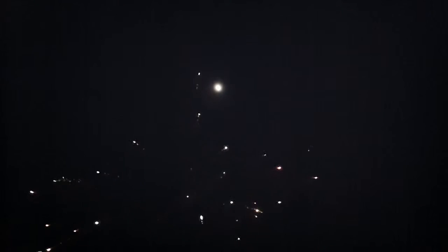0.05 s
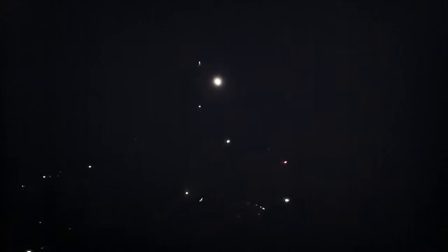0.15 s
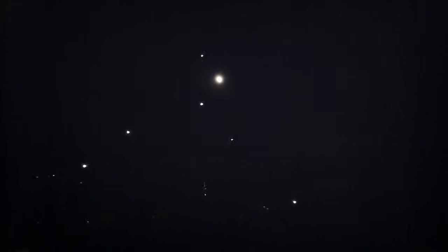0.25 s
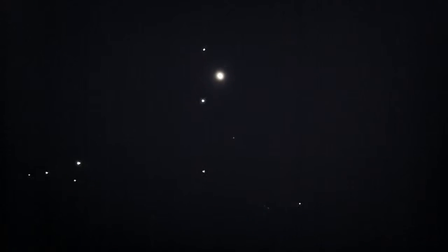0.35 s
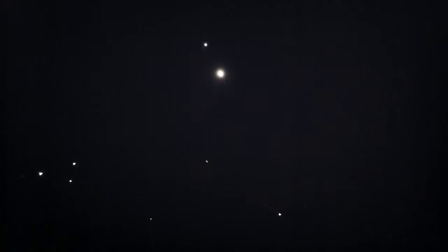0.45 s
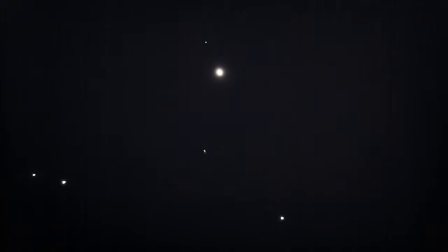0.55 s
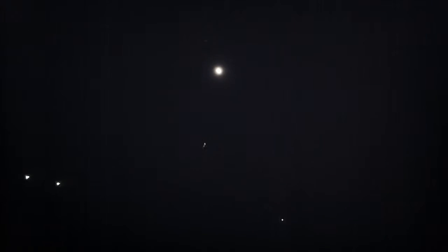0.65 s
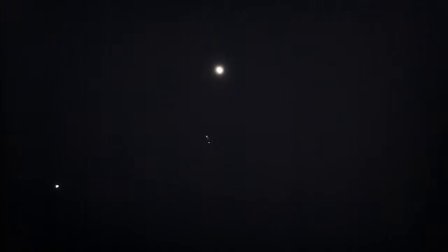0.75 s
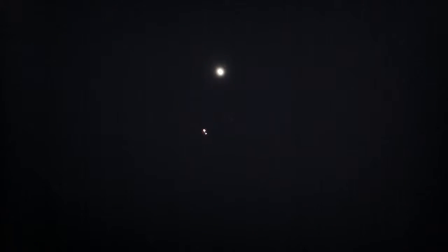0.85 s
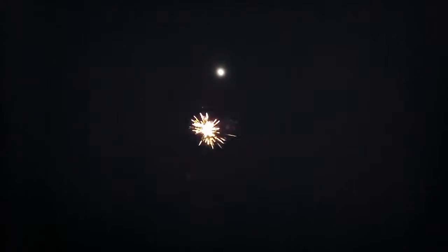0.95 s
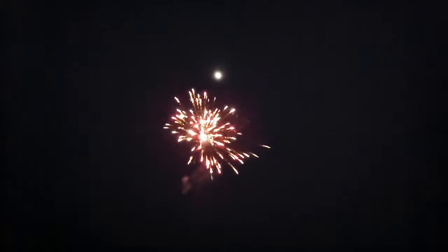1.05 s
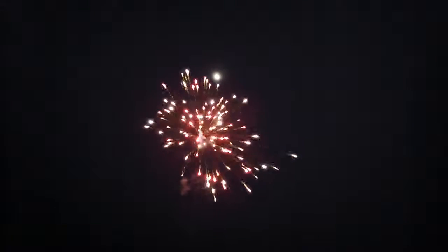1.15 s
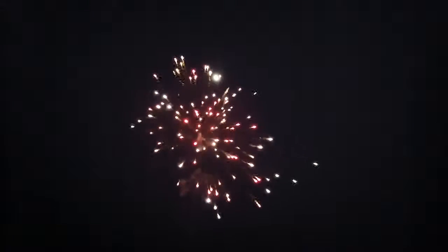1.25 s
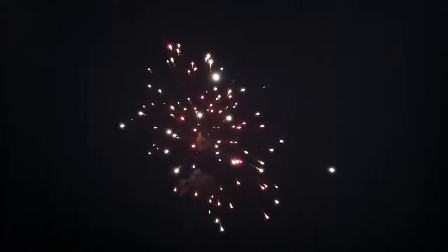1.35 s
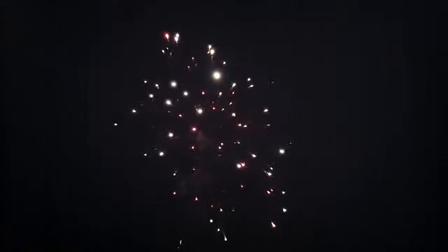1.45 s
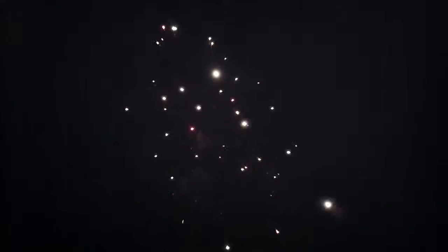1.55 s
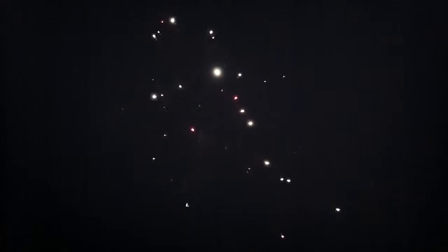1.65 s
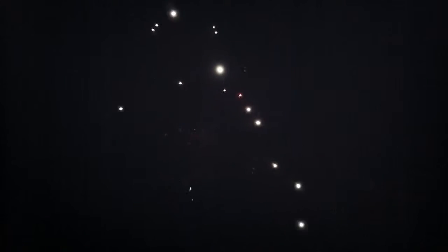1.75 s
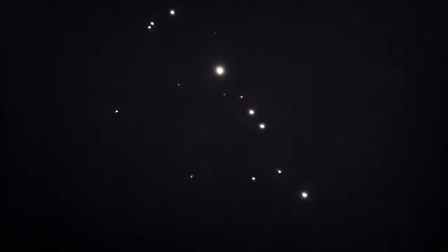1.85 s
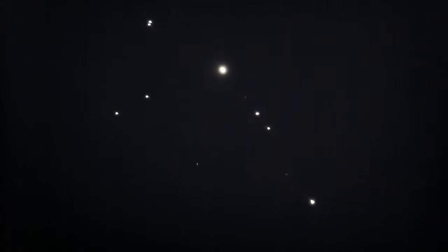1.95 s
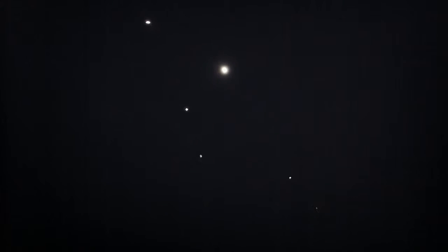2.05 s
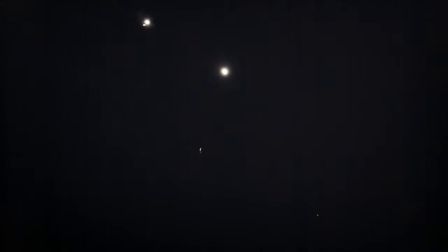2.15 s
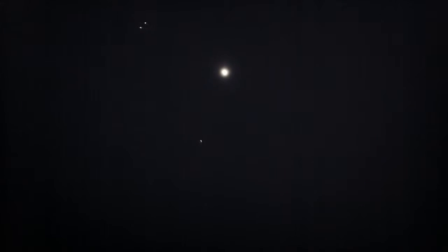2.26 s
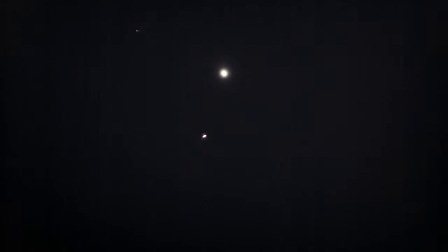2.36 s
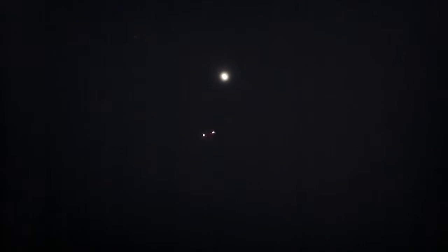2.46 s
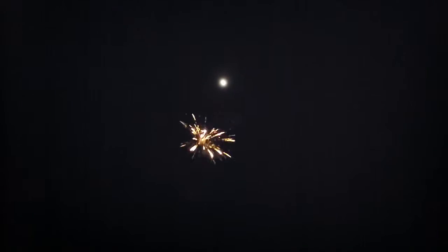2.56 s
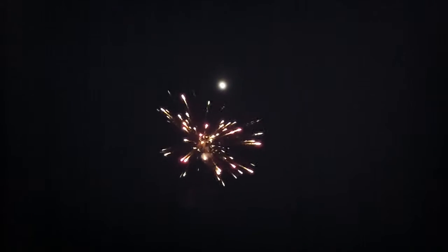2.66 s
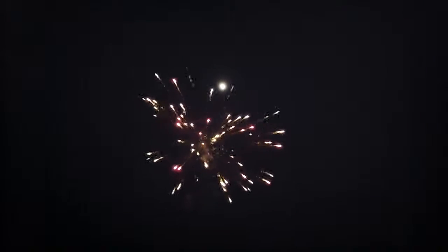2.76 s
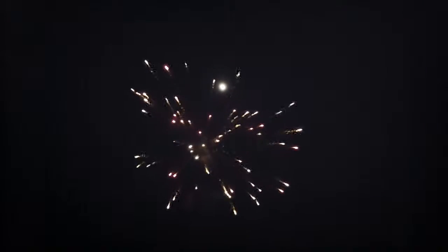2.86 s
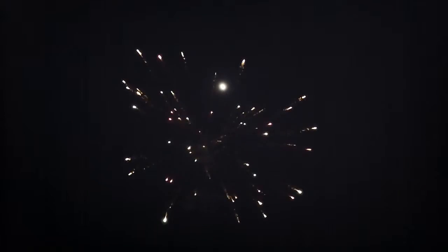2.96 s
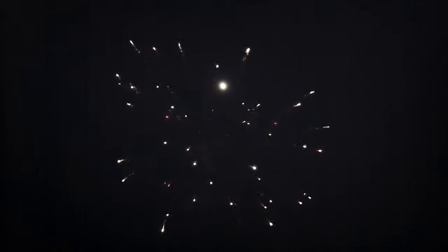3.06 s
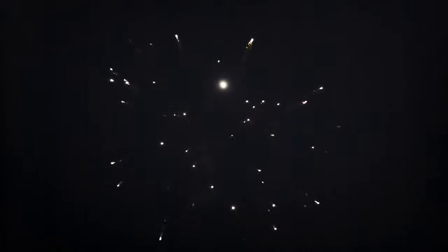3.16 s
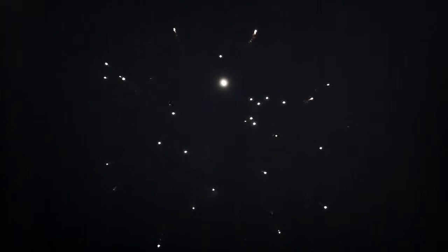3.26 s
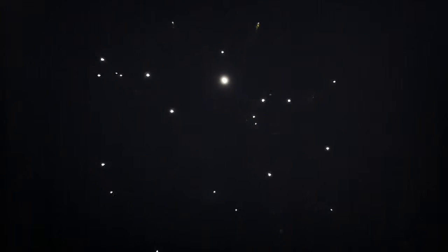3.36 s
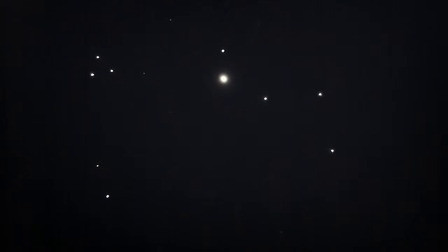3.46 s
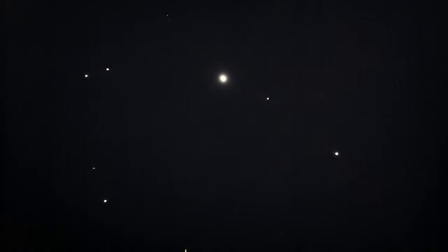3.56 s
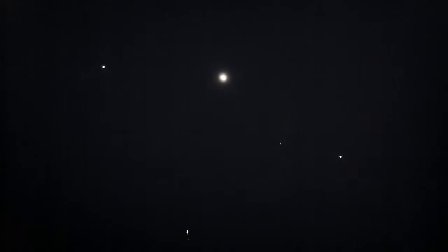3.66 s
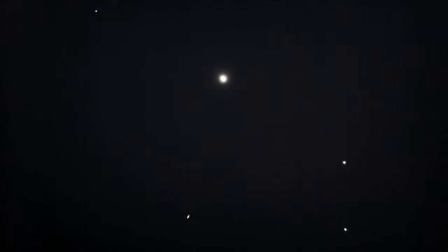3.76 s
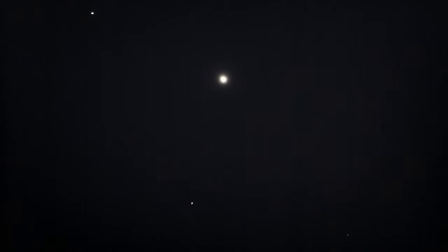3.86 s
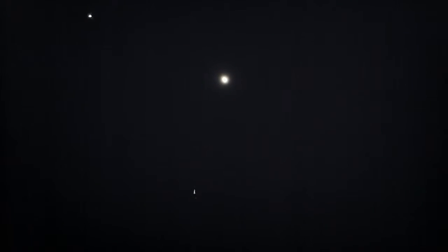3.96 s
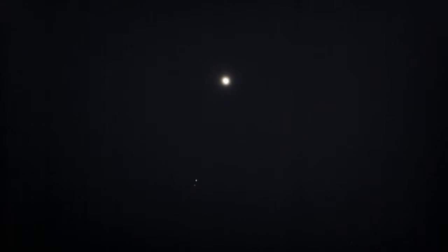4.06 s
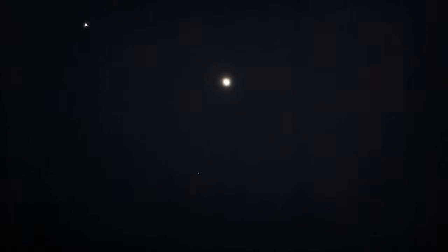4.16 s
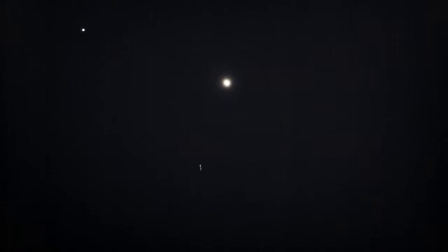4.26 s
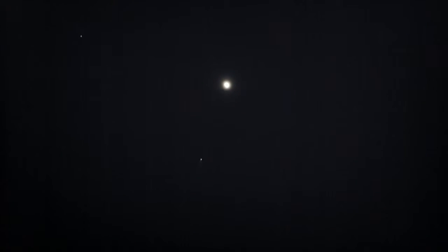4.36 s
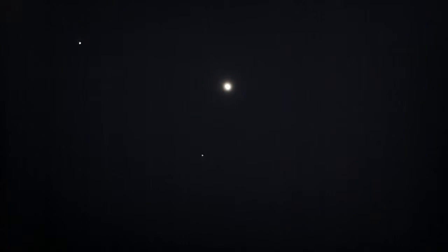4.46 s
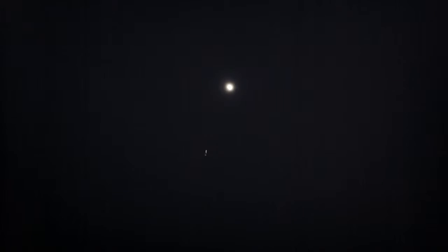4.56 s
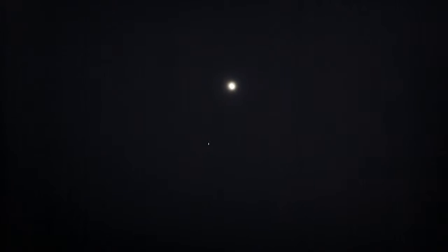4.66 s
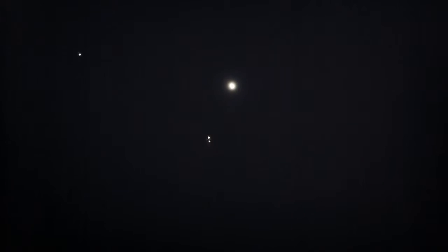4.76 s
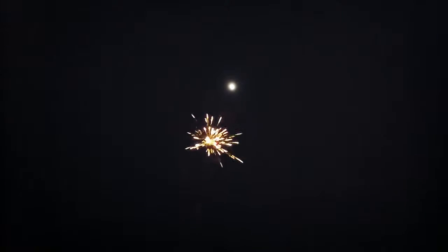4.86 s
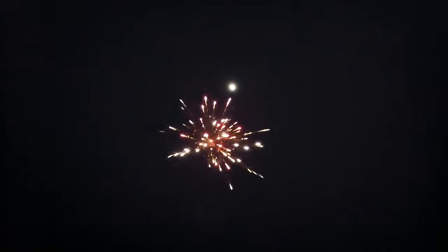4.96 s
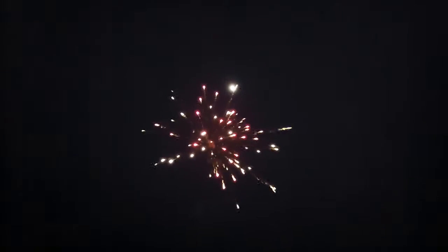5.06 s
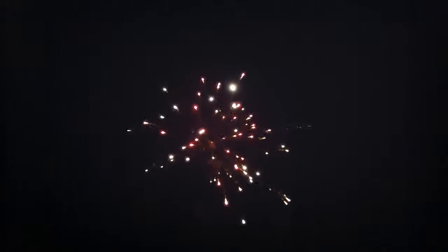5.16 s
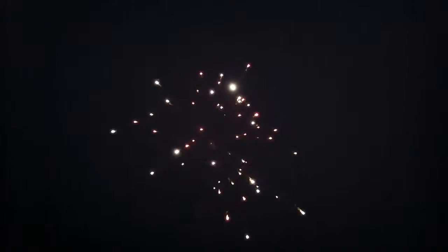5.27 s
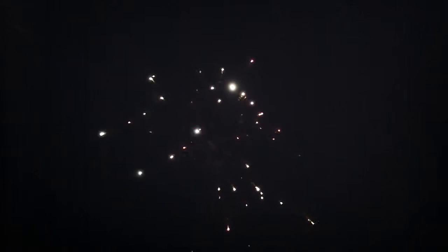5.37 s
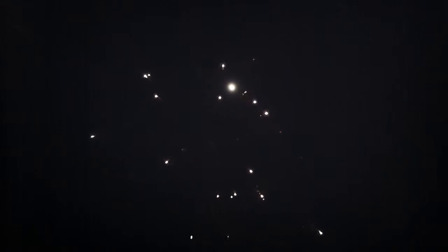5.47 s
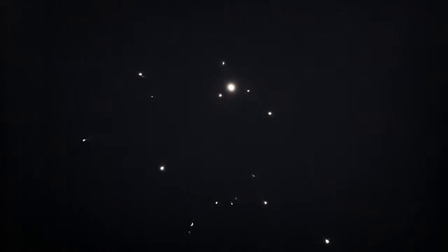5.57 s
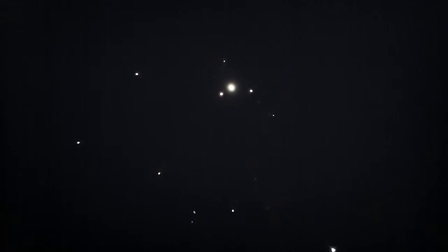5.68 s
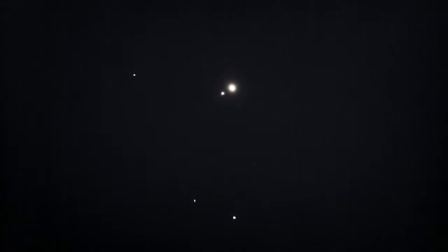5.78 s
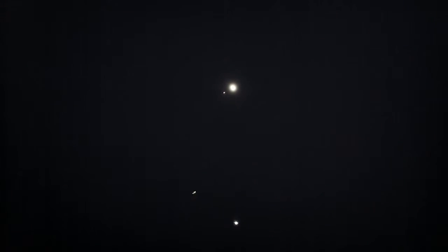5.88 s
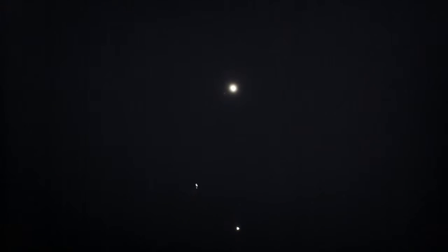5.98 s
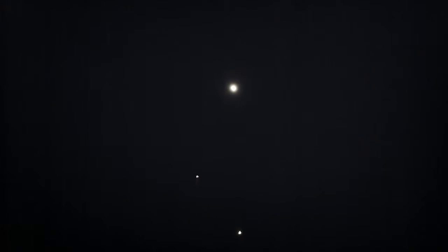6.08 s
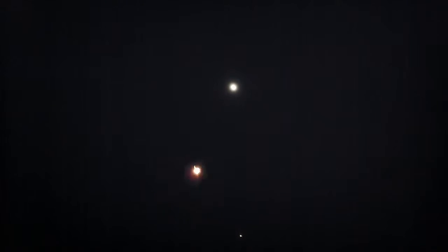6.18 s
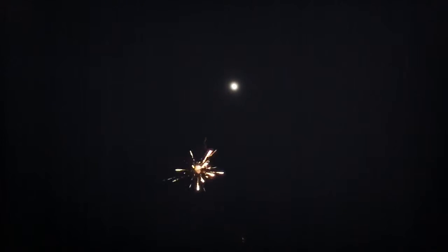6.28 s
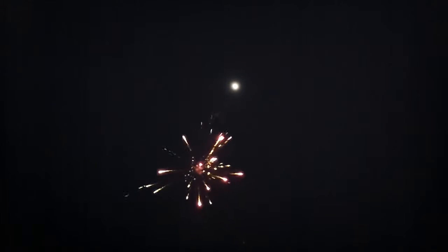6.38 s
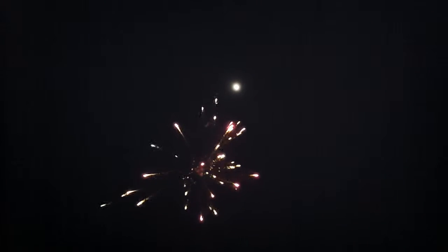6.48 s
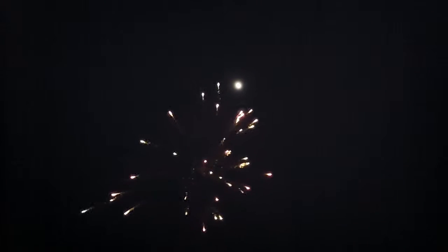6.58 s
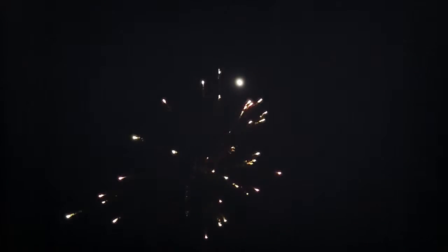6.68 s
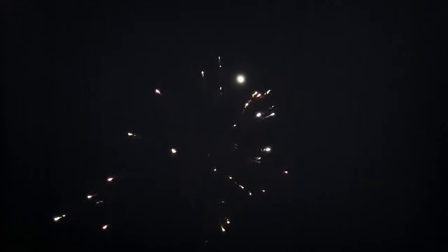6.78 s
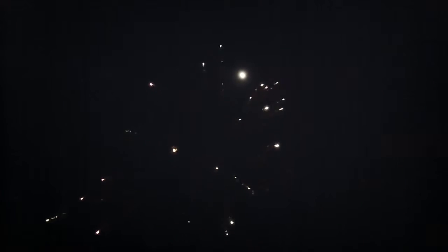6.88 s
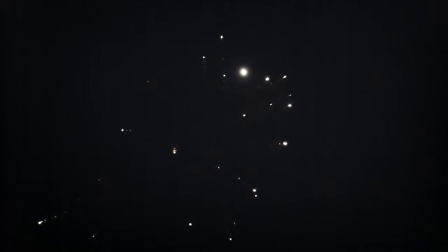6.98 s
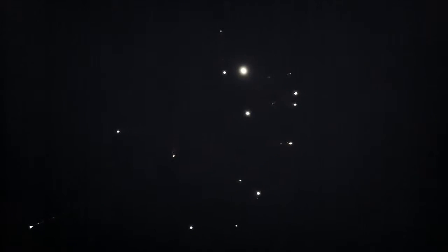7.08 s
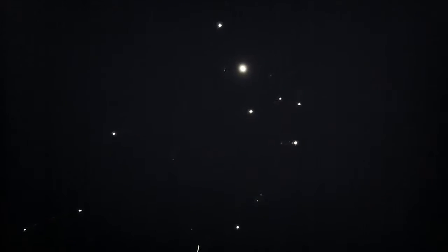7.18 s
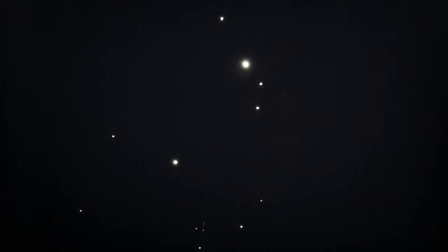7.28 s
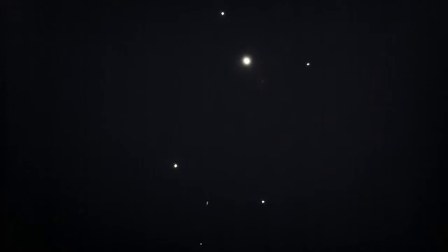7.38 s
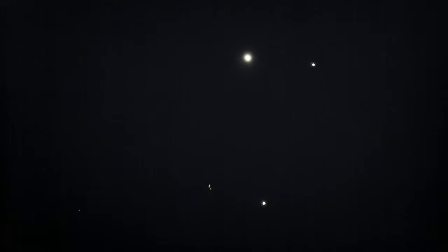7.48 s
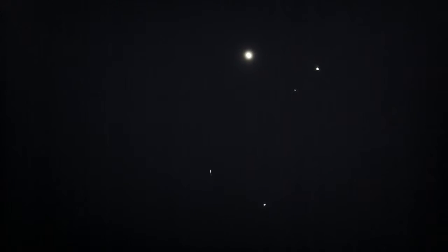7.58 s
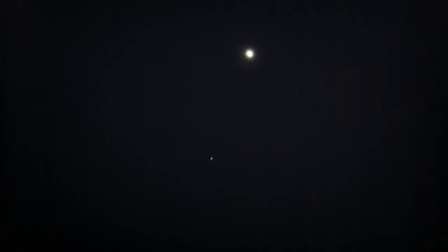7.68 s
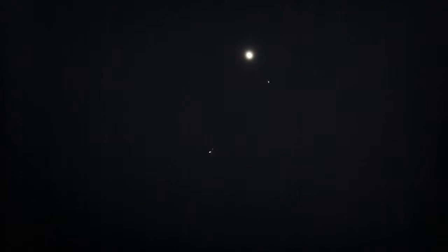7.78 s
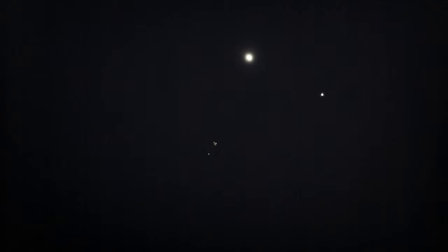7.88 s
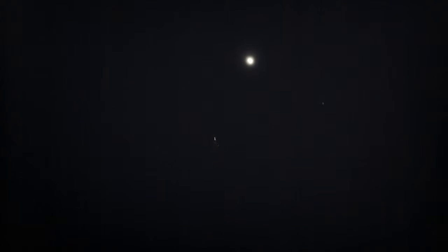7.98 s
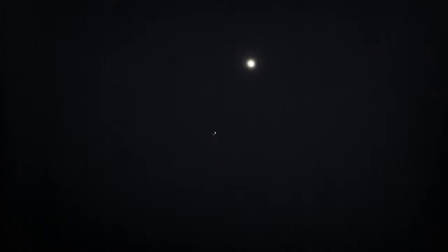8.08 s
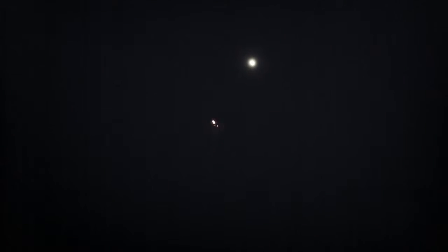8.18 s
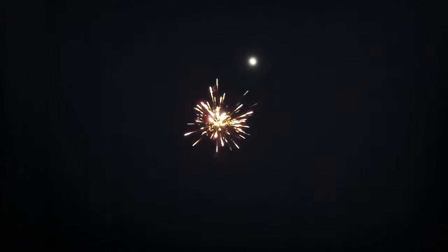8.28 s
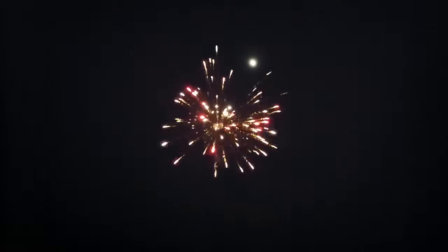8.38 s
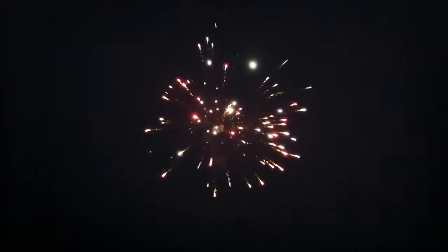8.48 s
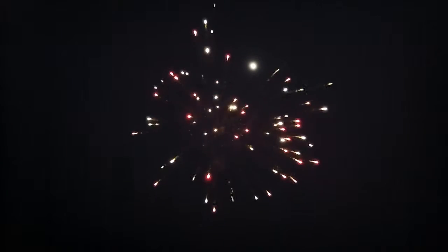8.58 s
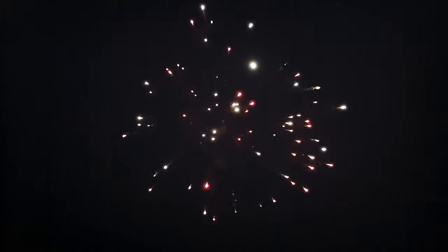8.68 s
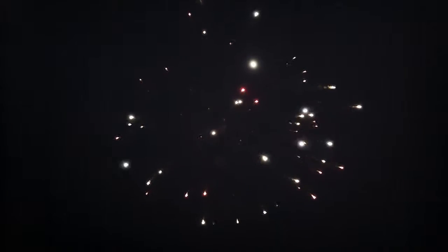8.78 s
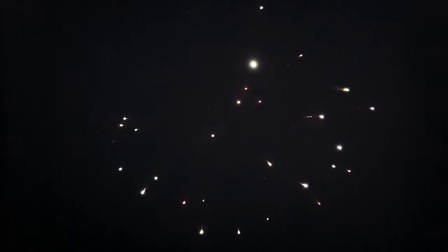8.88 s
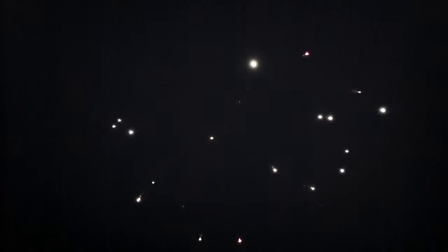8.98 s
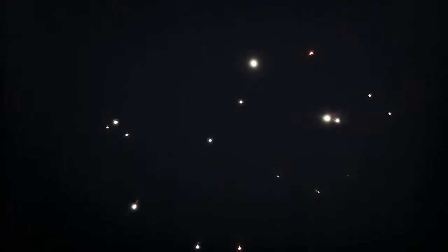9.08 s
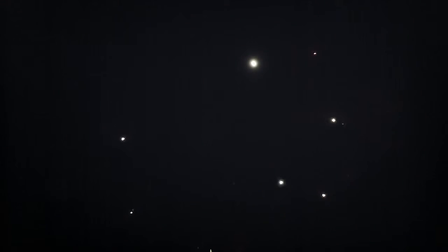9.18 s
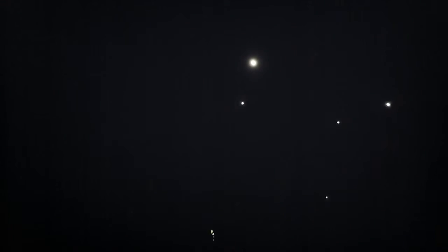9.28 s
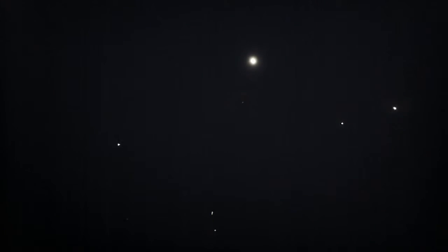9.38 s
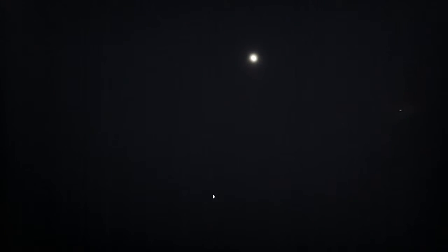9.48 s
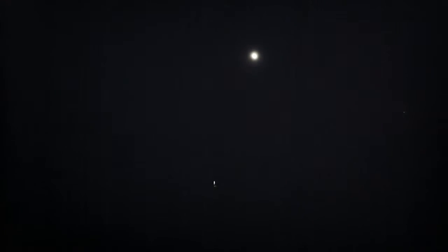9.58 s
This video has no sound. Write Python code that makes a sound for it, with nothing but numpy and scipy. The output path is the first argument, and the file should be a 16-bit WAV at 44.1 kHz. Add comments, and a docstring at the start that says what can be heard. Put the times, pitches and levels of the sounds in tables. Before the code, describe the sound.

Five loud firework bursts come at uneven gaps of one to two seconds, each accompanied by small launch pops and shrill, rough-edged whistles that sink in pitch. The outdoor microphone clips on the reports, which slap back from houses and roll off over roofs and trees. Low lumpy gusts buffet it in the middle. Quiet town hush and a far low engine lie beneath; the end is left whistling.

```python
"""A firework cake fires whistling shells over open ground at night, above town noise and a far engine's hum.
At first one shell is already whistling, pulsing fuel sounding a lengthening pipe, as an older report rolls away.
Then shells pop from their tubes, climb on falling whistles and burst as blast waves that overload the microphone.
Buildings return each report as dull slaps; roofs and trees scatter it into a long roll.
From about three to five seconds, gusts of wind buffet the microphone as low, lumpy noise."""
import sys
import numpy as np
from scipy import signal
from scipy.fft import rfft, irfft, next_fast_len
from scipy.io import wavfile
from scipy.ndimage import uniform_filter1d

SR = 44100
rng = np.random.default_rng(int(sys.argv[2]) if len(sys.argv) > 2 else 0)


def unload_wav(signal):
    """Save mono or channel-first audio to the path in sys.argv[1] as 16-bit WAV at rate SR, clipped to [-1, 1]."""
    wavfile.write(
        sys.argv[1],
        SR,
        np.round(np.clip(np.atleast_2d(signal).T, -1, 1) * 32767).astype(np.int16),
    )


N = 424683
TIME = np.arange(N) / SR
EDGE_HZ = 15300  # upper band limit

# steady pitch of the strongest partial, one list per shell: time_s, pitch_hz
SHELL_PITCHES = [
    [(0.0, 6359), (0.096, 6060), (0.146, 6354), (0.242, 5660), (0.258, 5050), (0.284, 5342), (0.4, 5240),
     (0.46, 4940), (0.904, 4444), (0.928, 4230), (1.003, 4398)],
    [(1.26, 6120), (1.32, 6750), (1.43, 6650), (1.48, 6288), (1.578, 6890), (1.674, 5990), (1.958, 5608),
     (2.044, 4896), (2.27, 4656), (2.348, 4800), (2.454, 4336), (2.535, 4470)],
    [(3.24, 5822), (3.286, 5741), (3.3, 6200), (3.392, 7150), (3.406, 6440), (3.48, 6400), (3.578, 7210),
     (3.672, 6200), (3.854, 6070), (4.08, 4975), (4.15, 5200), (4.24, 4730), (4.43, 4696), (4.91, 4131)],
    [(5.135, 6280), (5.189, 6300), (5.257, 7440), (5.289, 6580), (5.341, 6370), (5.395, 6870),
     (5.531, 6110), (6.055, 4915), (6.139, 4910), (6.295, 4600)],
    [(6.925, 6277), (6.997, 7006), (7.009, 8030), (7.073, 7320), (7.099, 6330), (7.161, 6780),
     (7.265, 6100), (7.283, 6600), (7.387, 6500), (7.497, 5776), (8.055, 4600), (8.163, 4666),
     (8.298, 4364)],
    [(9.05, 5100), (9.07, 4940), (9.262, 4900), (9.278, 6351), (9.332, 6550), (9.542, 5850), (9.63, 5800)],
    [(9.56, 6400), (9.602, 7700), (9.63, 7550)],
]
# behaviour of the same shells: catch_s (fuel catches), level_db, roughness_db,
# facing_s (nozzle faces the microphone), tumble_s (one turn), sputter_s (length of dying),
# sputter_level_db (relative), sputter_sag (share of pitch lost, 0-1)
SHELL_FLIGHTS = [(-.3, -25, 3, 0.098, 0.26, 0.13, -15, .02), (1.326, -25, 6.5, 1.3, 0.356, .08, -18, 0.06),
                 (3.398, -25, 12, 3.53, 0.34, 0.007, -16, .03),
                 (5.27, -24, 4.5, 5.335, 0.43, .08, -5.5, 0.12),
                 (7.075, -24.5, 11, 7.28, 0.475, .037, -1.5, 0.06),
                 (9.273, -24.5, 13.5, 9.32, 0.27, 0.019, 0, 0), (9.55, -29, -3, 10.7, 0.32, .02, 0, 0)]


def whistles(level_db=0, wet_db=-17, ring_s=1.0):
    """Superposition and convolution: all whistles add up, with faint exponentially dying ground scatter."""
    direct = np.zeros((2, N))
    for pitch, flight in zip(SHELL_PITCHES, SHELL_FLIGHTS):
        add(direct, *whistle(*burn(pitch, *flight)))
    ground = rng.standard_normal((2, SR)) * gain_of(-60 * TIME[:SR] / ring_s)
    ground /= np.linalg.norm(ground[0])
    wet = signal.fftconvolve(direct, ground, axes=1)[:, :N]
    return gain_of(level_db) * (direct + gain_of(wet_db) * wet)


# moments when the flame nearly goes out: time_s, level_db (relative)
FALTERS = [(.264, -6), (.641, -11.5), (1.012, -8), (1.838, -3), (4.09, -4.5)]
FALTER_S, FALTER_SAG_PER_DB = .01, .006  # Gaussian width; share of pitch lost with each dB
WARM_START_DB, WARM_END_DB, CATCH_S = -14.5, -4, 0.0121  # soft start, then a jump to full voice
TUMBLE_DB = 2.5  # swing of level as the nozzle turns towards and away
SETTLE_S = 0.29  # decay constant of the ragged start
UNSTEADY_HZ, UNSTEADY_WIDTH_HZ, UNSTEADY_DB = 5240, 230, 5.5  # the pipe turns ragged near this pitch
SPUTTER_DB = 8.5  # raggedness as the fuel runs out
LEFT_DB, OVERHEAD_DB, CLIMB_S = 2, -.5, 0.5  # from the left to about the middle
BETWEEN_EARLY_DB, BETWEEN_GROW_S = -6.5, 0.27  # in-between partials grow in after the catch


def burn(pitch, catch_s, level_db, rough_db, facing_s, tumble_s, sputter_s, last_db, sag):
    """Combustion drives the pipe: the shell warms up, catches, tumbles as it climbs and sputters out."""
    s, steady_hz = np.transpose(pitch)
    t = np.arange(s[0], s[-1] + sputter_s, 1 / SR)
    age = np.maximum(t - catch_s, 0)
    caught = np.clip(age / CATCH_S, 0, 1)
    dying = np.clip((t - s[-1]) / CATCH_S, 0, 1)
    falter_db = sum(db * np.exp(-((t - at) / FALTER_S) ** 2) for at, db in FALTERS)
    hz = np.interp(t, s, steady_hz) * (1 - sag * dying + FALTER_SAG_PER_DB * falter_db)

    warm_db = np.interp(t, [s[0], max(catch_s, s[0])], [WARM_START_DB, WARM_END_DB])
    tumble_db = TUMBLE_DB * np.cos(2 * np.pi * (t - facing_s) / tumble_s)
    db = level_db + falter_db + (1 - caught) * warm_db
    db += caught * (1 - dying) * tumble_db + dying * last_db

    unsteady_db = UNSTEADY_DB * np.exp(-((hz - UNSTEADY_HZ) / UNSTEADY_WIDTH_HZ) ** 2)
    ragged_db = caught * (rough_db * np.exp(-age / SETTLE_S) + unsteady_db) + dying * SPUTTER_DB
    between_db = BETWEEN_EARLY_DB * np.exp(-age / BETWEEN_GROW_S)
    left_db = OVERHEAD_DB + LEFT_DB * np.exp(-age / CLIMB_S)
    return t, hz, db, ragged_db, between_db, left_db


# partials of the whistle pipe: multiple (of the strongest partial), level_db (relative)
PIPE_PARTIALS = [(1 / 2, -21), (1, 0), (3 / 2, -13.5), (1.993, -19), (5 / 2, -18), (6 / 2, -17)]
# colour of the whistle, with the treble lost on the way down: frequency_hz, level_db (relative)
AIR_COLOUR = [(2000, -11.5), (3200, 1.5), (3700, 14), (4100, -4), (7000, -5.5), (8600, -5), (10000, -13),
              (11500, -22.5), (13000, -20.5), (15000, -23.5)]
# spectrum of the rushing gas jet: frequency_hz, level_db (per Hz, relative)
JET_SPECTRUM = [(1500, -10), (3200, -18), (4500, -11), (6500, -5.5), (8000, -5), (10000, -15), (14000, -52)]
FADE_IN_S = 0.026  # the tone creeps in


def whistle(t, hz, level, ragged_db, between_db, left_db,
            jet_db=-20, fuzz_db=-26, sputter_db=1.17, drift_db=1.43):
    """Pipe resonance: pulsing fuel sounds a pipe that lengthens as it burns, so the pitch falls."""
    size = len(t)
    unrest = gain_of(ragged_db + 2.5 * np.tanh(wander(size, hz=10)))
    stumbles = np.maximum(wander(size, hz=35) - 1.7, 0)  # brief sags of pitch and level
    waver = .0065 * np.sqrt(unrest) * wander(size, hz=20) - .03 * stumbles
    waver += .006 * wander(size, hz=65)  # flutter
    waver -= .1 * np.exp((t - t[-1]) / .006)  # droop as the flame dies
    jitter = .22 * unrest * wander(size, hz=280)
    phase = 2 * np.pi * np.cumsum(hz * (1 + waver)) / SR + jitter

    shortness = (hz / 6500) ** 4
    dull_db = 0.11 * ragged_db + 5.3 * shortness  # a ragged or short pipe loses its outer partials
    tone = np.zeros(size)
    for k, db in PIPE_PARTIALS:
        is_between = round(2 * k) % 2  # 1 between the whole multiples
        partial_db = db + between_db * is_between + read(AIR_COLOUR, k * hz) - abs(np.log2(k)) * dull_db
        tone += gain_of(partial_db) * (k * hz < EDGE_HZ) * np.sin(k * phase)

    # a short pipe has a fuzzy undertone and hisses more
    fuzz = wander(size, hz=260) * np.sin(phase * 3 / 4)
    fuzz += wander(size, hz=260) * np.cos(phase * 3 / 4)
    tone += gain_of(fuzz_db) * shortness * fuzz
    sputter = sputter_db * np.sqrt(unrest) * wander(size, hz=113)
    tone = evened(tone * gain_of(sputter - 1.3 * stumbles))
    hiss = evened(coloured(rng.standard_normal((2, size)), JET_SPECTRUM))
    jet = gain_of(jet_db) * np.sqrt(unrest * shortness) * hiss

    balance_db = left_db + drift_db * wander(size, hz=6.3)  # the shell tumbles
    sides = gain_of(np.array([[1], [-1]]) * balance_db)
    rise = (t - t[0]) / (FADE_IN_S if t[0] else .001)  # a shell sounding at time 0 starts at once
    edges = np.clip(np.minimum(rise, (t[-1] - t) / .001), 0, 1)
    return t[0], (tone * sides + jet) * gain_of(level) * edges


# shell bursts: start_s, strength_db (relative), tail_db (rolling tail, relative)
BURSTS = [(-.36, 5, -1), (1.1262, 0, -1), (2.6888, -1, -0.5), (4.9948, -1, -1.5), (6.3813, -2.5, 0),
          (8.4045, 0, 0.5)]
# paths of a report, straight and off the ground and near walls: delay_ms, left_db, right_db (relative)
REPORT_PATHS = [(0, 0, 3), (1.0, -16, -17), (2.0, -8, -12), (3.05, -8, -13), (3.9, -1, -4.5),
                (5.85, -18, -18), (8.0, -19, -23)]
# scatter close to the microphone: frequency_hz, level_db (per Hz, relative), t60_s
NEAR_SCATTER = [(40, -16, .4), (110, 4.5, 0.16), (187, 1, 0.12), (300, 1, 0.21), (490, 0.5, 0.23),
                (980, -5.5, 0.22), (2200, -18.5, 0.52), (4440, -12.5, 0.27), (8150, -20, 0.37),
                (15100, -28.5, 0.24)]
# rolling tail from all around: frequency_hz, level_db (per Hz, relative), t60_s
FAR_SCATTER = [(30, -28, 0.9), (92.5, -3, 1.43), (200, 11.5, 0.95), (357, -0.5, 1.67), (735, 1.5, 2.4),
               (950, -2, 2.51), (1300, -8, 2.06), (3260, -11, 1.69), (5000, -11, 1.26), (8000, -22, 1.09),
               (14900, -16.5, 0.19)]
# gain of the surroundings, on top of the tail's own decay: delay_s, level_db (relative)
SURROUNDINGS = [(.01, -3), (.06, -12), (.08, 3), (.16, 2.5), (.25, 6), (.33, 9.5), (.42, 6), (.55, 8),
                (1, 11), (2, 27)]


def bursts(blast_db=15, near_db=-12.0, far_db=-23, crack_db=-13):
    """Multipath propagation: each blast wave arrives by a few short paths, then scatters near and far."""
    out = np.zeros((2, N))
    u = TIME[:1024] / .0013  # blast wave lasts 1.3 ms
    wave = (1 - 2 * u) * (u < 1)  # a steep push, a slide into suction, a steep return
    band = signal.butter(1, [130, 2200], "band", fs=SR)
    wave = signal.lfilter(*band, uniform_filter1d(wave, size=3))
    crack_fade = np.exp(-TIME[:1024] / 0.0085)
    rolling = gain_of(np.interp(TIME[:2 * SR], *np.transpose(SURROUNDINGS)))
    for s, db, tail_db in BURSTS:
        for delay_ms, *sides_db in REPORT_PATHS:
            sides = gain_of(blast_db + db + np.array(sides_db))[:, None]
            add(out, s + delay_ms / 1e3, sides * wave)
        crack = gain_of(crack_db) * rng.standard_normal((2, 1024)) * crack_fade
        add(out, s + 0.00035, crack)
        add(out, s + 0.0022, gain_of(near_db + db) * scatter(NEAR_SCATTER, SR // 2, grain_db=0.5))
        tail = rolling * scatter(FAR_SCATTER, 2 * SR, grain_db=3.2)
        add(out, s, gain_of(far_db + tail_db) * tail)
    return out


# buildings that throw every report back: delay_s, level_db (relative)
BUILDINGS = [(.072, -7), (0.1947, -12), (.229, -15)]
# colour of a building's smeared echo: frequency_hz, level_db (per Hz, relative), t60_s
WALL_SCATTER = [(60, -38, .2), (250, 9.5, 0.22), (630, -3.5, 0.1), (930, 16, 0.076), (1540, -13, 0.39),
                (3060, -9, 0.35), (6000, -66, 0.16), (14000, -47, .1)]


def echoes(slap_db=2, smear_db=-12, clutter_db=-26):
    """Reflection: house fronts return a dull slap and short smear; roofs and trees add weaker ones."""
    out = np.zeros((2, N))
    slap = signal.lfilter(*signal.butter(2, [300, 2000], "band", fs=SR), shock(push_ms=0.34))
    for fired_s, _, _ in BURSTS:
        for delay_s, db in BUILDINGS:
            s = fired_s + delay_s
            add(out, s, gain_of(db + slap_db) * slap)
            add(out, s + 0.00099, gain_of(db + slap_db) * slap)  # bounce off the ground
            add(out, s, gain_of(db + smear_db) * scatter(WALL_SCATTER, SR // 4, grain_db=2))

    thud = signal.lfilter(*signal.butter(2, [130, 900], "band", fs=SR), shock(push_ms=1.1))
    for s, _, tail_db in BURSTS:
        for when, size, side, dull in rng.random((30, 4)):
            delay = .09 + .55 * when ** 1.5
            sides = gain_of(np.array([[6], [-6]]) * (side - 2.0))  # always to the right
            db = clutter_db + tail_db + 10 * size - 18 * delay
            add(out, s + delay, gain_of(db) * sides * (dull * thud + (1 - dull) * slap))
    return out


# shells leaving their tubes: start_s, level_db (relative)
LAUNCHES = [(0.944, 1), (3.078, 1.5), (4.753, 1.5), (6.689, 1.5), (8.707, 0.5), (9.409, 3.5)]
# colour of a tube's pop: frequency_hz, level_db (per Hz, relative), t60_s
TUBE_SCATTER = [(40, -12.5, 0.84), (133, -8, 0.76), (338, -20, 0.3), (720, -4, 0.21), (1350, -8.5, 0.23),
                (2580, -14.5, 0.18), (5270, -21, 0.19), (9400, -35, 0.2), (15000, -104, .12)]


def launches(pop_db=-10, body_db=-23, roll_db=-41, echo_s=.102, echo_db=-9, smear_db=-28):
    """Impulsive gas release: the lift charge pops in its tube and one wall answers thinly."""
    out = np.zeros((2, N))
    pop = signal.lfilter(*signal.butter(1, 3500, fs=SR), shock(push_ms=0.82))
    thin = signal.butter(2, [900, 3300], "band", fs=SR)
    answer_fade = np.exp(-TIME[:SR // 3] / .025)
    for s, db in LAUNCHES:
        add(out, s, gain_of(db + body_db) * scatter(TUBE_SCATTER, SR // 3, grain_db=0))
        add(out, s, gain_of(db + pop_db) * pop)
        add(out, s + 0.00132, gain_of(db + pop_db) * pop)  # bounce off the ground
        answer = gain_of(smear_db) * scatter(TUBE_SCATTER, SR // 3, grain_db=3) * answer_fade
        add(answer, 0, gain_of(echo_db) * pop)
        add(out, s + echo_s, gain_of(db) * signal.lfilter(*thin, answer))
        add(out, s, gain_of(db + roll_db) * scatter(FAR_SCATTER, SR, grain_db=2.5))
    return out


# sharp ticks of burning stars: start_s, level_db
STAR_TICKS = [(0.3845, -22), (1.2867, -12), (1.856, -37), (5.589, -36)]


def star_ticks():
    """Impulse radiation: each tick of a burning star is one tiny blast wave."""
    out = np.zeros((2, N))
    for s, db in STAR_TICKS:
        add(out, s, gain_of(db) * shock(push_ms=0.46))
    return out


# gusts on the microphone: peak_s, level_db (relative)
GUSTS = [(3.19, -32), (3.34, -26.5), (3.5, -29), (3.72, -20), (3.96, -29), (4.25, -21.5), (4.4, -25.5),
         (4.54, -24), (4.79, -20), (5.01, -22)]
# spectrum of the buffeting: frequency_hz, level_db (per Hz, relative)
BUFFET_SPECTRUM = [(15, 1.5), (30, -2), (60, -4.5), (100, -8.5), (160, -33.5), (300, -39.5), (800, -70)]
BREEZE_DB = -47  # relative level between the gusts
GUST_DB_PER_S = 171  # how fast a gust swells and dies


def wind(wind_db=-1, lumps_db=3):
    """Turbulent pressure: wind strikes each port on its own as lumpy low noise, stronger on the right."""
    lumps = gain_of(lumps_db * wander(N, hz=25))
    buffeting = evened(coloured(rng.standard_normal((2, N)) * lumps, BUFFET_SPECTRUM))
    gusts = sum(gain_of(db - GUST_DB_PER_S * abs(TIME - s)) for s, db in GUSTS)
    force = gain_of(BREEZE_DB) + gusts
    return buffeting * gain_of(wind_db) * force * gain_of([[0], [4.5]])


# partials of the far engine: frequency_hz, level_db (rms, before the swell)
ENGINE_PARTIALS = [(91.5, -53.5), (123.8, -51), (183, -60.5), (247.6, -59)]
# swell of the engine: time_s, level_db (relative)
ENGINE_SWELL = [(0, -15), (.9, -0.5), (1.6, -14.5), (4.6, -6.5), (6, -0.5), (9.6, -0.5)]


def engine():
    """Additive synthesis: a far engine hums as a few sines, each wavering in pitch on its own."""
    hum = np.zeros(N)
    for f, db in ENGINE_PARTIALS:
        hz = f * (1 + 0.01255 * wander(N, hz=3.6))
        hum += gain_of(db) * np.sqrt(2) * np.sin(2 * np.pi * np.cumsum(hz) / SR)
    return hum * gain_of(np.interp(TIME, *np.transpose(ENGINE_SWELL)))


# night background: frequency_hz, level_db (per Hz, relative)
TOWN_SPECTRUM = [(25, -38), (60, -17), (120, 6), (200, -4), (400, -7), (750, -5.5), (1050, -7.5),
                 (1600, -10.5), (3000, -24.5), (6000, -18.5), (10000, -58), (15000, -51)]


def town(floor_db=-45):
    """Diffuse field: distant town noise is steady, spectrally shaped noise."""
    hz, t, z = air_noise(N)
    return gain_of(floor_db) * evened(sounded(z * gain_of(read(TOWN_SPECTRUM, hz))[:, None], N))


# likeness of diffuse sound at the two ports: frequency_hz, likeness (correlation, 0-1)
PORT_LIKENESS = [(30, .2), (120, 0.18), (300, 0.19), (600, 0.51), (1200, 0.37), (2500, 0.62), (5000, 0.59),
                 (12000, 0.067)]


def air_noise(size):
    """Spatial coherence: short-time spectra of diffuse noise, partly shared by the two ports."""
    hz, t, z = signal.stft(rng.standard_normal((2, size)), SR, nperseg=512, noverlap=384)
    same = np.clip(read(PORT_LIKENESS, hz), -1, 1)[:, None]
    return hz, t, np.array([z[0], same * z[0] + np.sqrt(1 - same ** 2) * z[1]])


def sounded(z, size):
    """Overlap-add: short-time spectra back to sound."""
    return signal.istft(z, SR, nperseg=512, noverlap=384)[1][:, :size]


def scatter(bands, size, grain_db):
    """Reverberation: many small reflections, each band dying at its own speed; rms about 1 at the start."""
    hz, t, z = air_noise(size)
    colour = evened(gain_of(read(bands, hz)))[:, None]
    t60_s = np.maximum(read(bands, hz, axis=2), .01)[:, None]
    fade = gain_of(-60 * t / t60_s)
    grain = evened(gain_of(grain_db * wander(size, hz=68.0)))
    return sounded(z * colour * fade, size) * grain


def shock(push_ms):
    """Blast wave: a sudden push followed by a longer suction."""
    u = np.arange(1024) / SR * 1000 / push_ms
    return (1 - u) * np.exp(-u)


def wander(size, hz):
    """Low-pass noise: random motion of rms 1, mostly no faster than about hz."""
    padded = next_fast_len(size)
    f = np.fft.rfftfreq(padded, 1 / SR)
    spectrum = rfft(rng.standard_normal(padded)) / (1 + (f / hz) ** 2)
    return evened(irfft(spectrum, padded)[:size])


def coloured(x, points):
    """Linear filtering: gives a sound a spectrum."""
    size = next_fast_len(x.shape[-1])
    gain = gain_of(read(points, np.fft.rfftfreq(size, 1 / SR)))
    return irfft(rfft(x, size) * gain, size)[..., :x.shape[-1]]


def read(points, hz, axis=1):
    """Log-frequency interpolation: reads one column of a table."""
    columns = np.transpose(points)
    return np.interp(np.log(hz + 1), np.log(columns[0] + 1), columns[axis])


def gain_of(db):
    """Level law: decibels to amplitude."""
    return 10 ** (np.asarray(db) / 20)


def evened(x):
    """Power normalization: scales to rms 1."""
    return x / np.sqrt(np.mean(x ** 2) + 1e-20)


def add(mix, s, sound):
    """Superposition: adds a sound at time s, trimmed to the mix."""
    at = round(s * SR)
    sound = sound[..., max(-at, 0):]
    part = mix[:, max(at, 0):][:, :sound.shape[-1]]
    part += sound[..., :part.shape[-1]]


def scene():
    """Superposition: everything that reaches the microphone."""
    fireworks = whistles() + bursts() + echoes() + launches() + star_ticks()
    return fireworks + wind() + engine() + town()


def record(dry):
    """Saturation and band limiting: loud reports overload the microphone, then the top is cut."""
    clipped = dry / (1 + dry ** 6) ** (1 / 6)
    low_pass = signal.firwin(511, EDGE_HZ, window=("kaiser", 8), fs=SR)
    return signal.oaconvolve(clipped, low_pass[None], "same")


dry = scene()
out = record(dry)
unload_wav(out)
```